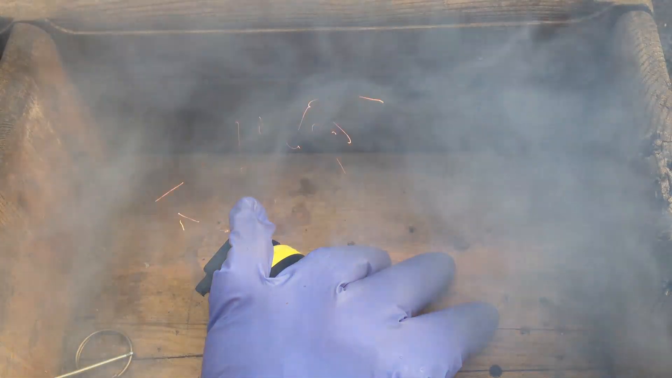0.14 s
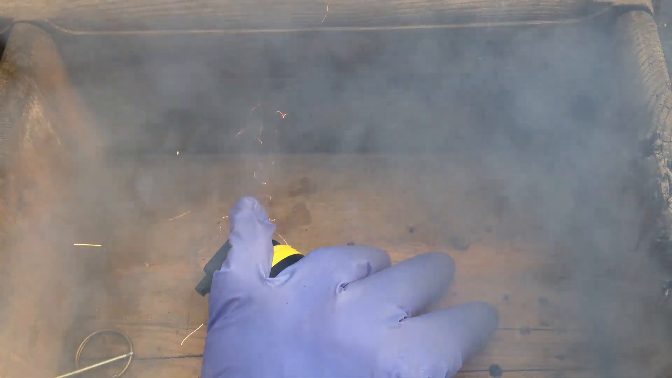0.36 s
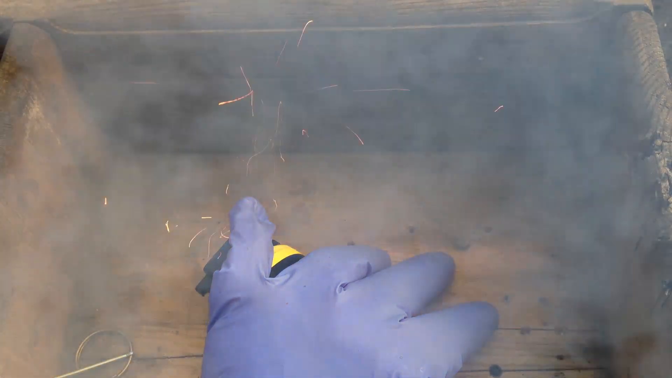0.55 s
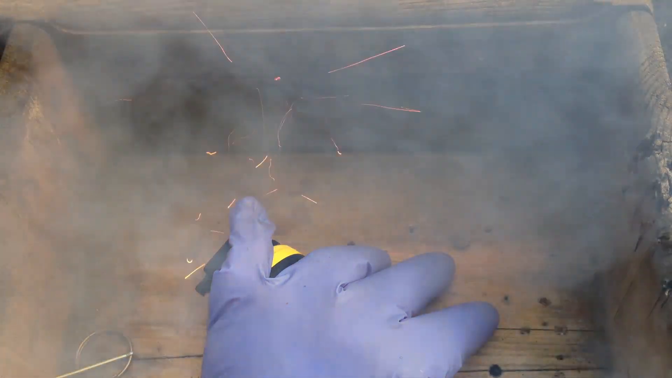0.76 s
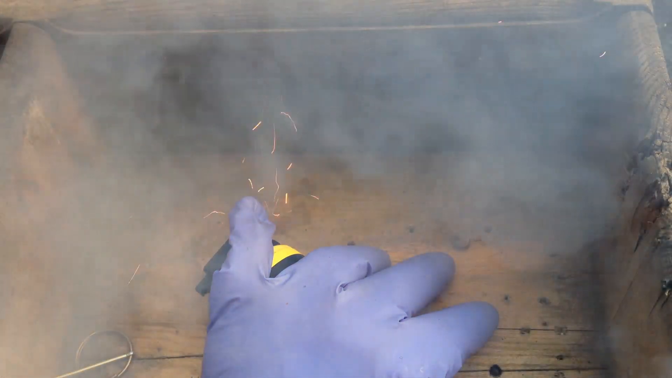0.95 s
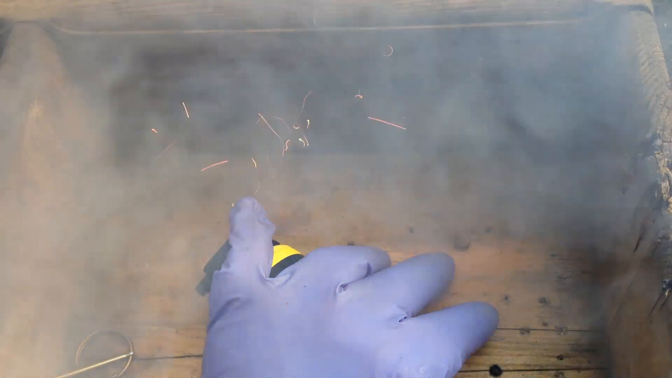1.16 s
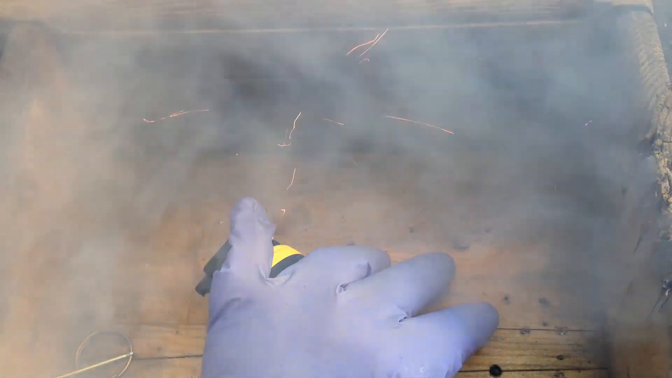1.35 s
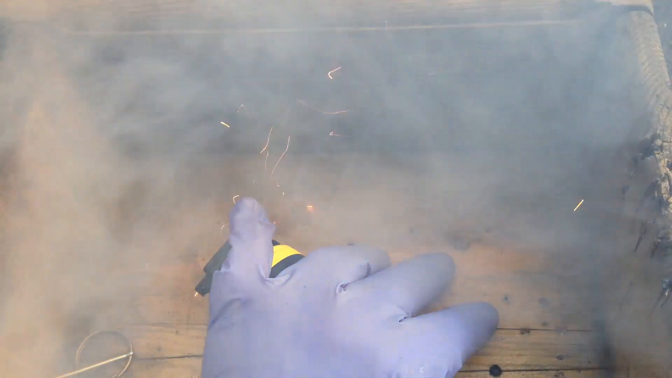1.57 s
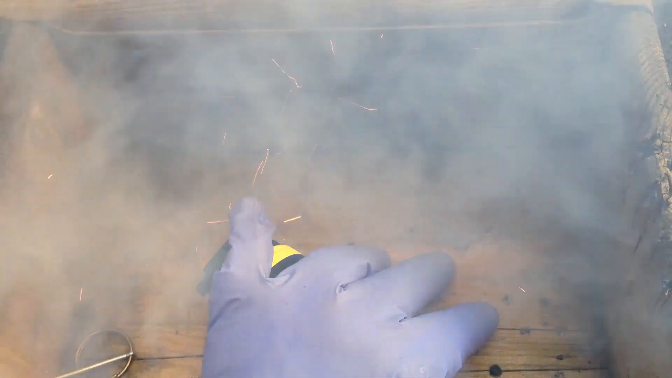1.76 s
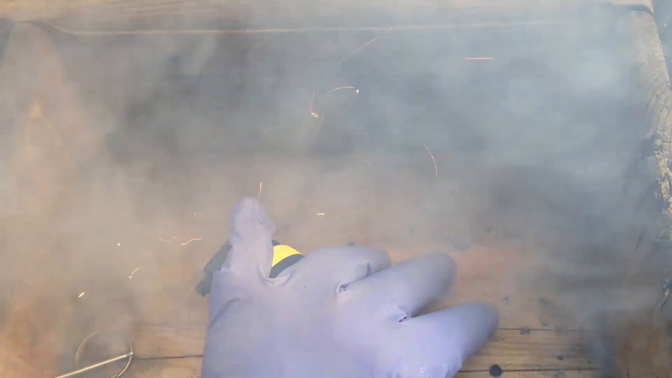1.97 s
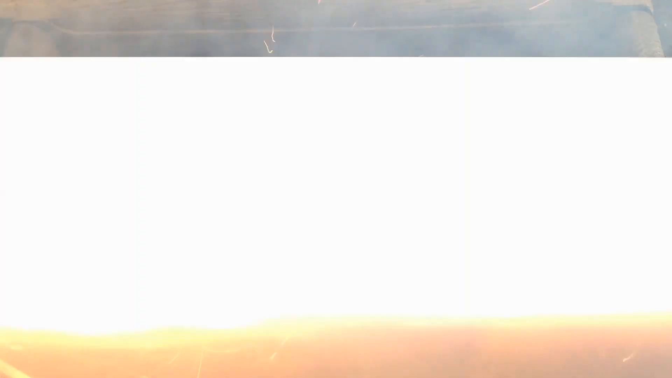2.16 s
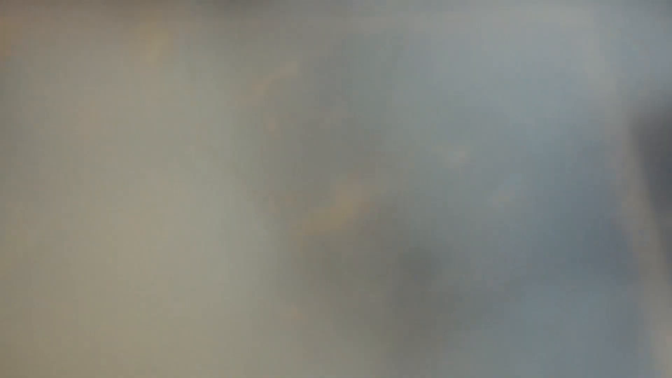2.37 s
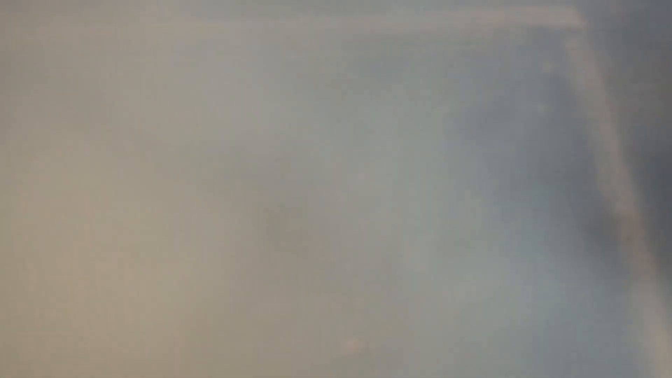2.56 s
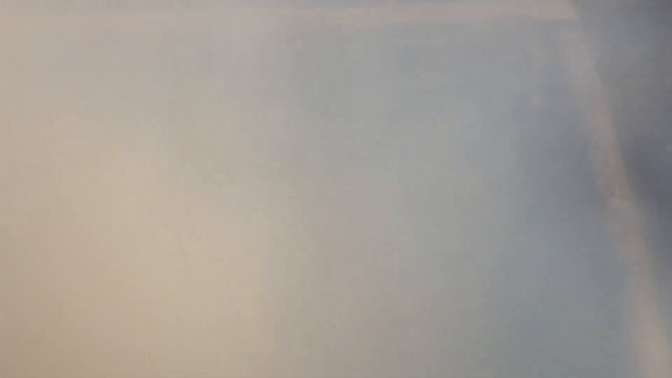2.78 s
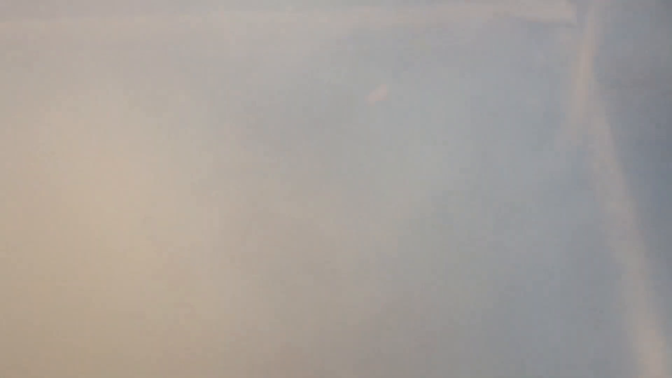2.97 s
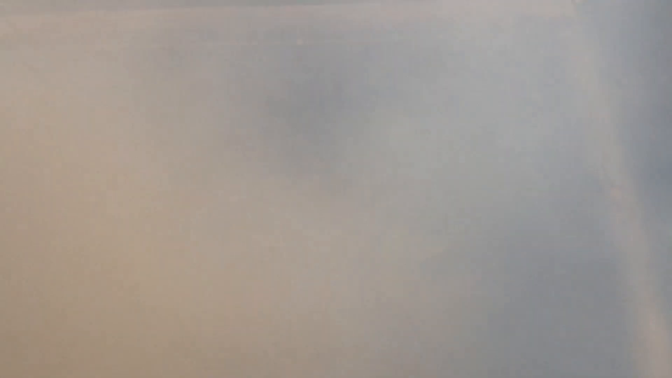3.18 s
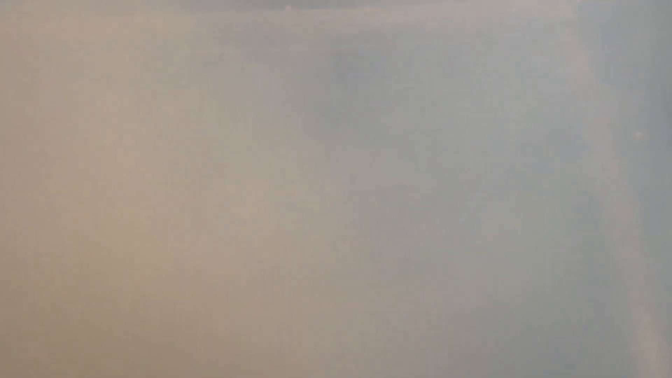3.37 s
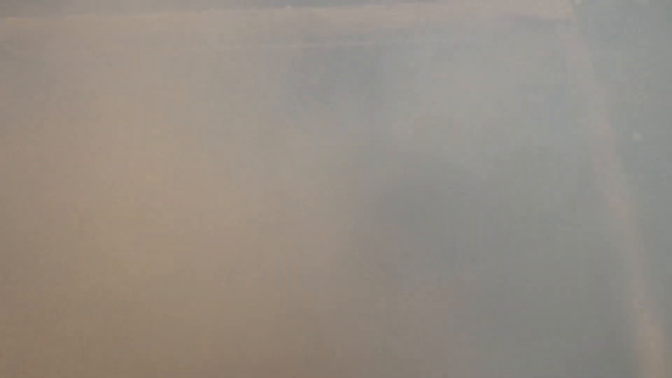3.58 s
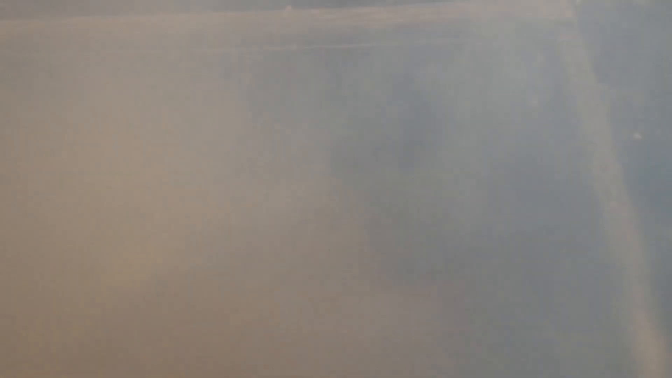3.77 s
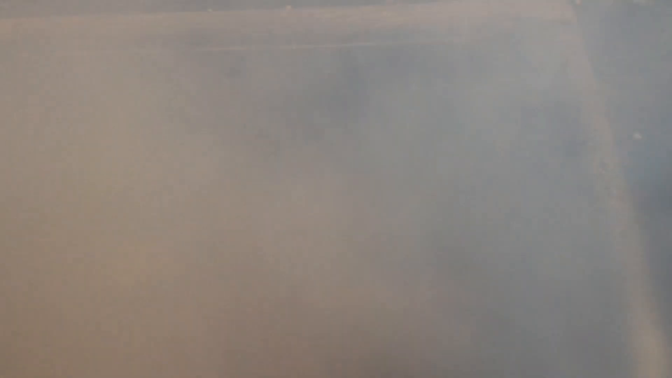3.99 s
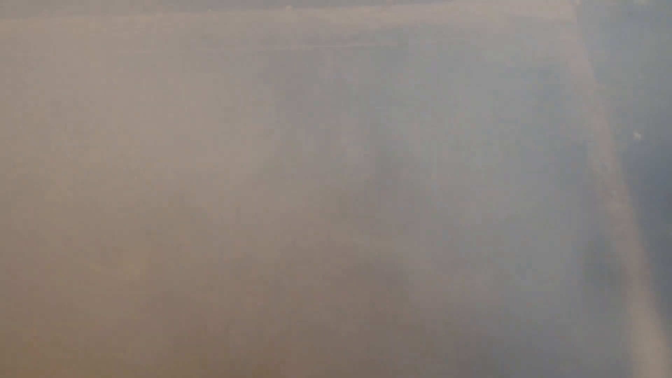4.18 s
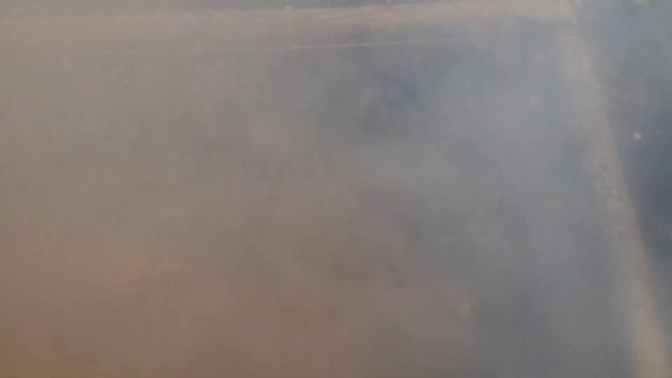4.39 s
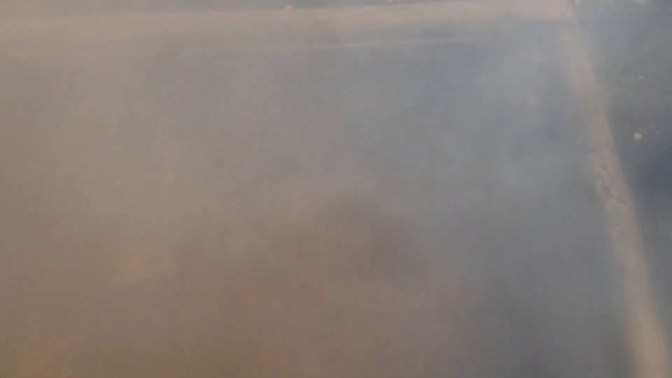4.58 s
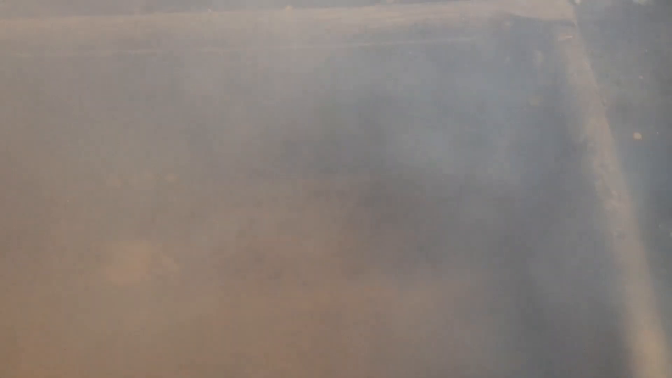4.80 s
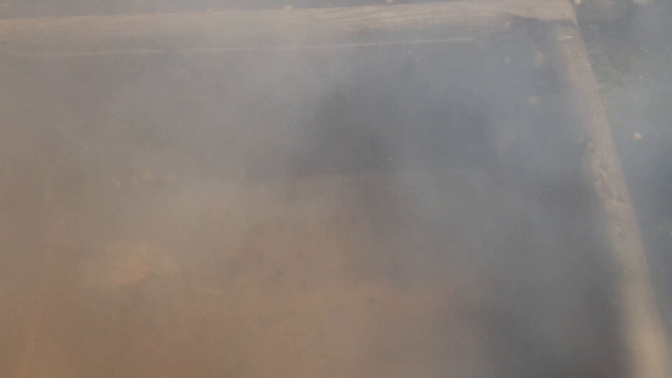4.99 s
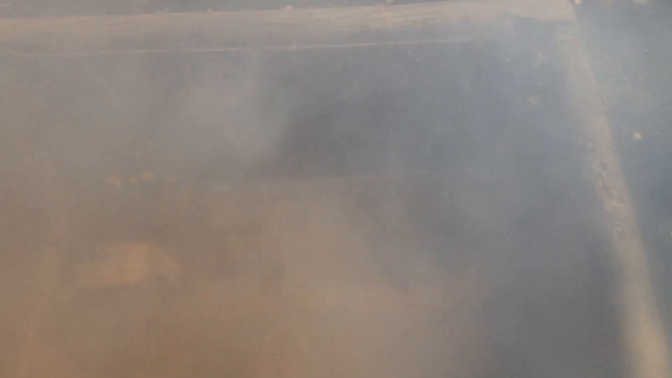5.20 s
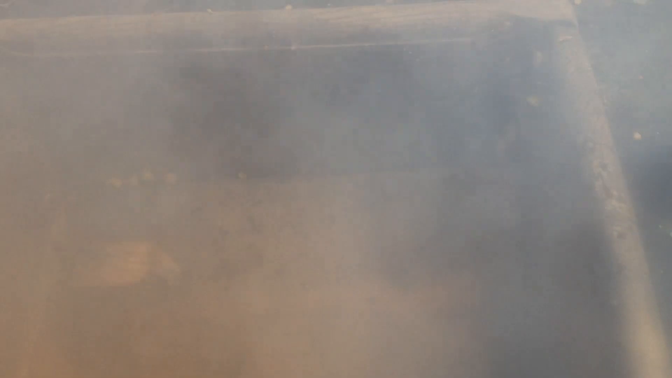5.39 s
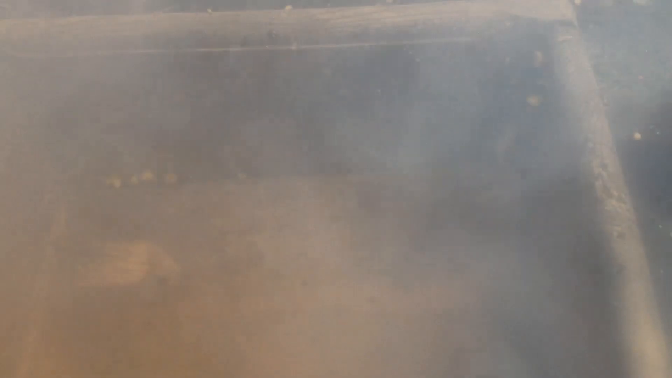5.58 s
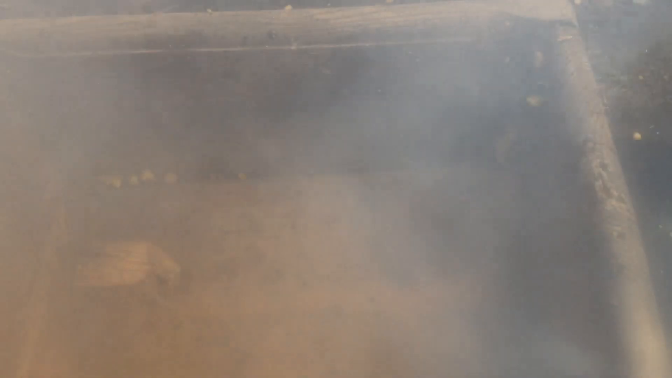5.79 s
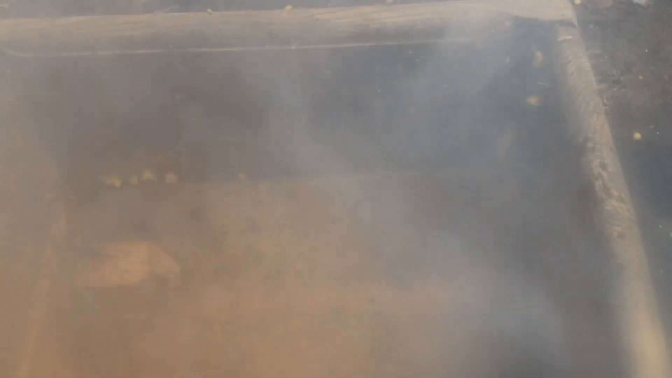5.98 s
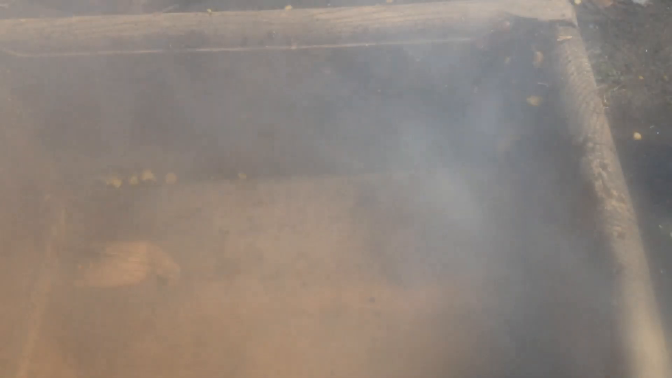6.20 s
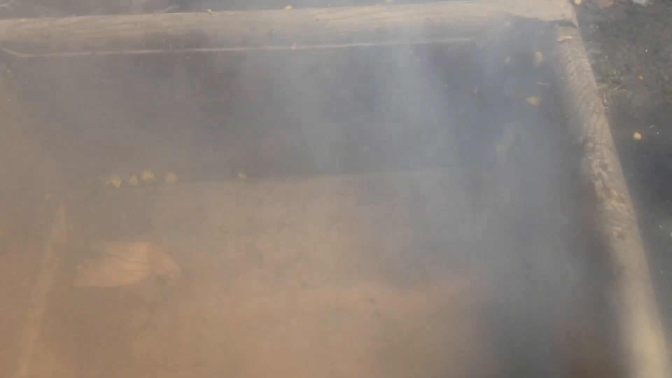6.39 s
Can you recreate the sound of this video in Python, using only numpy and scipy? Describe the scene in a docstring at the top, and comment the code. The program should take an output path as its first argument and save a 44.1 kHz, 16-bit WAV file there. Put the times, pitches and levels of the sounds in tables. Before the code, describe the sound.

Close spitting fuse hiss in a wooden crate bursts into a single hard blast, then debris rains down and thins to faint ticks over distant rumble.

```python
"""In an open wooden crate outdoors, a fuse hisses and roars, flares up and sets off a small charge.
The fuse is shaped noise coloured by the crate; the blast is one sharp pressure pulse and fading bands of noise.
Grit, made of short noise puffs, rains back with fragments that click, knock and ring the boards.
Dark, low noise makes a distant rumble that swells again at the end.
A close mono microphone overloads on the blast."""
import sys
import numpy as np
from scipy import signal
from scipy.fft import rfft, irfft
from scipy.io import wavfile

SR = 44100
rng = np.random.default_rng(int(sys.argv[2]) if len(sys.argv) > 2 else 0)


def unload_wav(signal):
    """Save mono or channel-first audio to the path in sys.argv[1] as 16-bit WAV at rate SR, clipped to [-1, 1]."""
    wavfile.write(
        sys.argv[1],
        SR,
        np.round(np.clip(np.atleast_2d(signal).T, -1, 1) * 32767).astype(np.int16),
    )


def voltage_ratio(level):
    """Linear amplitude factor for a level in decibels (scalar or array-like)."""
    return 10 ** (np.asarray(level, float) / 20)


N = 284312  # length in samples
HZ = np.maximum(np.fft.rfftfreq(N, 1 / SR), 1)  # every frequency of the spectrum

# strength of the fuse jet: (time [s], hiss level [dB])
FUSE_JET = [(0.0, -26), (0.25, -27.5), (0.3, -23), (0.6, -23), (1.25, -21.5), (2.16, -22.5)]
# the flame reaches the charge and puffs: (time [s], dull puff [dB], bright puff [dB], time to fall 60 dB [s])
FLARE_PUFFS = [(2.17, -17, -27, 0.09), (2.182, -23.5, -21, 0.057), (2.196, -24, -29, 0.15)]
# tone of the dull puffs: (frequency [Hz], relative level [dB])
FLARE_TONE = [(59, -43), (100, -19), (721, -1), (1160, -5.5), (2030, -7), (2330, -1), (2680, -7),
              (4000, -13), (5200, -44), (8800, -120)]
# tone of the hiss: (frequency [Hz], relative level [dB])
HISS_TONE = [(880, -61), (1500, -12.5), (2010, -16.5), (2240, -10), (2540, -14), (2890, -11.5),
             (3720, -20.5), (4750, 0.5), (7020, -8.5), (8130, -7.5), (9790, -14), (10700, -14),
             (12300, -18.5), (13700, -13.5), (15500, -15.5)]
# tone of the roar: (frequency [Hz], relative level [dB])
ROAR_TONE = [(180, -15), (300, -8.5), (648, 2), (734, 4), (2010, -2.5), (2230, 2), (2550, -11),
             (2860, -0.5), (3600, 1.5), (4680, -9), (7920, -120)]
# crate resonances that colour the jet: (frequency [Hz], width [Hz], change [dB])
CRATE_RESONANCES = [(2268, 35, 7), (2890, 120, 6.5), (3430, 68, 6.5), (4063, 48, 7.5), (4300, 60, 5),
                    (4700, 39, 5.5), (4680, 46, 2.5), (5050, 57, -4), (5535, 60, 9), (5900, 57, 8),
                    (6280, 38, 8), (6670, 68, 7), (7000, 93, 5.5), (7360, 96, 6), (7910, 110, 7),
                    (8400, 120, 5.5)]
# narrow dips in the tone of the jet: (frequency [Hz], width [Hz], change [dB])
JET_DIPS = [(2590, 52, -7), (2770, 44, -5), (2965, 94, -9.5), (3410, 31, -16), (3700, 46, -8),
            (4310, 47, -13), (4410, 57, -5), (5700, 59, -5), (7170, 46, -9), (7150, 53, -20),
            (9200, 60, -1), (9640, 100, -10), (9800, 89, -9), (12500, 110, -21), (14350, 100, -8)]
# low modes of the air in the crate, heard on the rumble: (frequency [Hz], width [Hz], change [dB])
CRATE_AIR_MODES = [(172, 25, -1), (232.5, 16, 5.5), (373, 33, 3.5), (444, 30, 2), (556, 32, 5),
                   (746, 53, 2), (1000, 30, 3), (1137, 39, 5.5), (1252, 37, 6), (1324, 22, 7.5),
                   (1550, 20, 2)]
# distant rumble, swelling and fading: (time [s], level [dB])
RUMBLE_LEVEL = [(0.0, -34.5), (0.48, -35), (1.18, -34), (1.49, -36.5), (1.8, -36), (2.66, -39.5),
                (3.34, -38), (3.82, -42.5), (4.79, -43.5), (5.3, -41.5), (5.85, -37.5), (6.45, -38)]
# tone of the rumble: (frequency [Hz], relative level [dB])
RUMBLE_TONE = [(15, -74), (25, -49), (86, -7), (126, -3), (204, 5.5), (313, 0), (537, -1.5), (631, -3),
               (741, -2), (1240, -3.5), (1800, -9.5), (2230, -10.5), (2420, -16.5), (6210, -24),
               (15500, -40.5)]
# the blast by pitch: (frequency [Hz], level at its height [dB], time to its height [s], time to fall 60 dB [s])
BLAST_BANDS = [(30, -47, .01, .3), (60, -38.5, 0.045, .5), (121, -26, 0.066, .45), (221, -12.5, 0.072, 0.6),
               (337, -15, 0.094, 0.17), (570, -10.5, 0.061, 0.43), (940, -11.5, 0.035, 0.42),
               (2000, -11, 0.043, 0.27), (4000, -13, 0.041, 0.3), (8040, -19, 0.022, 0.43),
               (15000, -29, 0.024, 0.42)]
# amount of falling grit: (time [s], patter level [dB])
GRIT_LEVEL = [(2.33, -22), (2.51, -24.5), (2.7, -27.5), (3.04, -34), (3.25, -32.5), (3.47, -40.5),
              (3.99, -52.5), (4.3, -44.5), (4.6, -59.5)]
# tone of the patter: (frequency [Hz], relative level [dB])
GRIT_TONE = [(180, -24), (300, 1.5), (410, -28), (447, 0), (480, 0), (1050, -9.5), (1380, -6), (2360, -6),
             (4230, -7.5), (7480, -6), (9000, -14.5), (11700, -63), (19800, -120)]
# fragments landing: (time [s], strength [dB], knock pitch [Hz], thud against knock [dB], tick against knock [dB])
LANDINGS = [(2.418, -6, 7700, -12, -6), (2.4317, -16, 3670, -16, -8), (2.7053, -12, 5950, -11, 2),
            (2.7647, -19, 4760, -23, -12), (2.7784, -29, 6520, -15, -10), (2.82, -23, 2820, -10, -8),
            (2.8572, -13, 2310, 5.5, -8), (2.8898, -15, 2740, -7, -6), (2.9955, -21, 6030, 3, -12),
            (3.0253, -21, 3920, 11, -18), (3.053, -19, 1100, 4, -10), (3.0726, -21, 4120, 0, 3),
            (3.2104, -22.5, 4670, 14, 8), (3.3409, -9.5, 3300, -25, -20), (3.4274, -8, 3660, -11.5, -9),
            (3.5541, -21.5, 1890, -9, -17), (3.7143, -1, 4560, -21, -8), (3.765, -26, 2870, -10, -1),
            (3.8496, -31, 3320, 6, -13), (3.8995, -30, 2010, -9, -14), (3.9545, -28.5, 2660, -5, -12),
            (4.0047, -34, 6000, -2, -2), (4.0417, -32.5, 6000, -8, 0), (4.569, -38.5, 650, 16, -16),
            (4.8319, -30.5, 900, 11, -19), (4.994, -37, 3500, -12, -9)]
# small hard bits that snap on the wood with little body:
# (time [s], click strength [dB], knock pitch [Hz], thud against knock [dB], tick against knock [dB])
HARD_SNAPS = [(2.369, -6, 2000, -6, -12), (2.646, -14, 2090, -9, -8), (2.931, -9.5, 3600, 5.5, 5.5),
              (2.9457, -12.5, 4150, -17, 8), (2.9836, -6.5, 3200, 1, 6), (3.3043, -4, 2700, -7, -15),
              (3.829, -22, 3500, 5, -14), (3.9325, -26, 4650, 2, -5), (4.4299, -17.5, 3480, -1, -6)]
# fragments landing, the longer ones sliding in softly:
# (time [s], strength [dB], knock pitch [Hz], tick against knock [dB], time to fall 60 dB [s])
TIMED_LANDINGS = [(2.5234, -18.5, 7250, 6.5, 0.38), (2.589, -10.5, 4900, 3, 0.15),
                  (2.6176, -13, 4590, -5, 0.094), (3.099, -18, 1550, -3, 0.061),
                  (3.1657, -23.5, 3540, 4, 0.078), (3.198, -15, 740, -16, 0.25),
                  (3.2314, -26, 2240, -9, 0.074), (3.265, -18.5, 3150, -20, 0.078),
                  (3.4494, -23, 4500, 1, 0.14), (3.6611, -28.5, 3690, -7, 0.095),
                  (3.7994, -24.5, 7900, -6, 0.087), (3.8726, -26.5, 3800, -12, 0.09),
                  (4.153, -22, 6700, -2.5, 0.34), (4.3535, -28.5, 2370, 9, 0.094),
                  (4.7594, -39.5, 1570, 1, 0.14), (5.442, -38.5, 4000, -2, 0.25),
                  (6.4283, -31, 1520, 1, 0.13)]
# struck boards: (frequency [Hz], relative level [dB], time to fall 60 dB [s])
BOARD_MODES = [(1690, 10, 0.26), (2245, 8.5, 0.21), (2834, 0, 0.096), (3350, 9, 0.037), (4130, -24, 0.21),
               (4355, 10, 0.098), (4760, 4, 0.17), (6200, 6, 0.086), (8400, 0, 0.2), (8700, -30, 0.28),
               (10000, -39, 0.11), (10150, -24, 0.16), (10830, -21, 0.077)]

# T60 means the time to fall 60 dB
ROAR_BELOW_DB, GUST_DB, GUSTS_PER_S = -15.5, 2.5, 4.2  # the roar under the hiss, and how it gusts
FLARE_ATTACK_S = 0.0028
CHOKE_S, CHOKE_DB, CHOKE_LENGTH_S = 2, -12, 0.0083  # the jet falters as the flame enters the case
BANG_S, SHOCK_DB, SHOCK_S = 2.2468, -2, 0.00105
AT_ONCE_HZ, SURGE_POWER = 500, 2.9  # far above this pitch the blast starts at full height; far below it surges late
LUMPS_DB, LUMPS_PER_S = 1.5, 37  # the boom comes back from the walls in lumps
GRAINS_PER_S, GRAIN_T60_S = 700, 0.021  # the rate wavers
FINE_SHARE = 0.3  # even patter under the separate grains
DUST_DB, DUST_SETTLES_DB_PER_S = -4.5, 7.5  # finer dust against the patter
HIT_T60_S, LOUD_HIT_DB, T60_S_PER_DB = 0.044, -4.5, 0.01  # the heaviest pieces sound longer
CLICK_DB, CLICK_CYCLES = -14, 4.5  # first contact rings a few cycles
THUD_ATTACK_S = 0.00079  # the thud swells after the contact
SNAP_CLICK_DB, SNAP_T60_S = 8, 0.049  # the click of a snap is set this far over its strength as a hit
TIMED_THUD_DB = -8  # thud against knock in TIMED_LANDINGS
OVERLOAD, CUTOFF_HZ = 0.82, 15850  # full-scale limit of the input; pitch where the top is fully cut


def rms_one(x):
    """Scales a sound to an average strength (rms) of one."""
    return x / np.sqrt(np.mean(x ** 2) + 1e-20)


def in_time(rows):
    """Draws straight lines between the rows of a table, one value a sample, for each column."""
    s, *columns = np.transpose(rows)
    return [np.interp(np.arange(N) / SR, s, c) for c in columns]


def at_hz(points, hz, column=1):
    """Reads a table between its frequencies, with octaves equally wide."""
    points = np.array(points)
    return np.interp(np.log(hz), np.log(points[:, 0]), points[:, column])


def resonances_db(rows):
    """Adds up peaks (or dips) in dB, each falling to half its dB half a width away."""
    return sum(db / (1 + (2 * (HZ - hz) / width) ** 2) for hz, width, db in rows)


def coloured(x, db):
    """Gives every frequency its own gain in dB, then scales to rms one."""
    return rms_one(irfft(rfft(x) * voltage_ratio(db), N))


def band(x, low_hz, high_hz):
    """Keeps mainly the pitches between two limits, without sounding ahead of time."""
    return signal.sosfilt(signal.butter(2, [low_hz, high_hz], "band", fs=SR, output="sos"), x)


def drift(rate):
    """Slow random wandering with rms one: noise smoothed twice, faster for a higher rate."""
    r = np.exp(-2 * np.pi * rate / SR)
    smooth = signal.lfilter([1], [1, -2 * r, r * r], rng.standard_normal(N + SR))
    return rms_one(smooth[SR:])  # leave out the start-up


def fuse():
    """Turbulent gas from the burning tip: bright fluttering hiss, dull gusty roar, last puffs, then silence."""
    t = np.arange(N) / SR
    choke_db = CHOKE_DB * np.exp(-((t - CHOKE_S) / CHOKE_LENGTH_S) ** 2)
    jet_db = in_time(FUSE_JET)[0] + choke_db
    peaks_and_dips_db = resonances_db(CRATE_RESONANCES + JET_DIPS)
    fluttering = rng.standard_normal(N) * voltage_ratio(0.7 * drift(45))
    hiss = coloured(fluttering, at_hz(HISS_TONE, HZ) + peaks_and_dips_db)
    rough = rng.standard_normal(N) * voltage_ratio(2.2 * drift(24))
    roar = coloured(rough, at_hz(ROAR_TONE, HZ) + peaks_and_dips_db)
    flare = coloured(rng.standard_normal(N), at_hz(FLARE_TONE, HZ))
    gusts = voltage_ratio(ROAR_BELOW_DB + GUST_DB * drift(GUSTS_PER_S))
    out = voltage_ratio(jet_db) * (hiss + gusts * roar)
    for s, dull_db, bright_db, t60 in FLARE_PUFFS:
        since = np.maximum(t - s, 0)
        shape = np.minimum(since / FLARE_ATTACK_S, 1) * voltage_ratio(-60 * since / t60)
        out += shape * (voltage_ratio(dull_db) * flare + voltage_ratio(bright_db) * hiss)
    return out * (t < BANG_S)


def outdoors():
    """Dull far noise, gently uneven, coloured by the air in the crate."""
    (level_db,) = in_time(RUMBLE_LEVEL)
    tone_db = at_hz(RUMBLE_TONE, HZ) + resonances_db(CRATE_AIR_MODES)
    return voltage_ratio(level_db + 1.0 * drift(5.7)) * coloured(rng.standard_normal(N), tone_db)


def self_noise():
    """The microphone's own faint hiss: steady noise, equally strong at all pitches."""
    return voltage_ratio(-69.5) * rng.standard_normal(N)


def bang():
    """An N-shaped pressure shock, then the crate and yard answer; lows build later than highs."""
    t = np.maximum(np.arange(N) / SR - BANG_S, 0)
    out = voltage_ratio(SHOCK_DB) * (1 - 2 * t / SHOCK_S) * (t > 0) * (t < SHOCK_S)
    edges = 25 * 2 ** np.arange(0, 9.6, 0.5)  # half-octave bands [Hz]
    white = rng.standard_normal((2, N))
    lumps = [drift(LUMPS_PER_S) for _ in edges[::3]]  # three neighbouring bands share one
    for k, (low, high) in enumerate(zip(edges, edges[1:])):
        middle = np.sqrt(low * high)
        db, height_s, t60 = (at_hz(BLAST_BANDS, middle, column=c) for c in range(1, 4))
        at_once = low / (low + AT_ONCE_HZ)
        surge = np.minimum(t / height_s, 1) ** SURGE_POWER
        build = (at_once + (1 - at_once) * surge) * (t > 0)
        fall_db = -60 * np.maximum(t - height_s, 0) / t60
        boom = rms_one(band(white[k % 2], low, high))
        out += boom * build * voltage_ratio(LUMPS_DB * lumps[k // 3] + db + fall_db)
    return out


def grit():
    """Uneven falling grains, each a short puff of noise, over finer dust that settles sooner."""
    (patter_db,) = in_time(GRIT_LEVEL)
    t = np.arange(N) / SR
    born = rng.random(N) < GRAINS_PER_S * voltage_ratio(2.5 * drift(40)) / SR
    sizes = voltage_ratio(3.0 * np.minimum(rng.exponential(1, N), 4)) * born
    puffs = rms_one(signal.lfilter([1], [1, -voltage_ratio(-60 / (GRAIN_T60_S * SR))], sizes))
    patter = coloured(rng.standard_normal(N) * (puffs + FINE_SHARE), at_hz(GRIT_TONE, HZ))
    dust = rms_one(band(rng.standard_normal(N) * (puffs + 0.83), 13000, 21300))
    dust_db = DUST_DB - DUST_SETTLES_DB_PER_S * (t - BANG_S)
    started = t > GRIT_LEVEL[0][0]
    fade_out = np.clip((GRIT_LEVEL[-1][0] + 0.32 - t) / 0.17, 0, 1)
    return (patter + dust * voltage_ratio(dust_db)) * voltage_ratio(patter_db) * started * fade_out


def fragments():
    """Each landing knocks at its own pitch, with a thud below and a tick above, and rings the boards anew."""
    out, t = np.zeros(N + SR), np.arange(SR // 4) / SR
    # every row: time, strength, knock pitch, thud, tick, fall time, click
    rows = []
    for s, db, hz, thud_db, tick_db in LANDINGS:
        t60 = HIT_T60_S + T60_S_PER_DB * max(db - LOUD_HIT_DB, 0)
        rows.append((s, db, hz, thud_db, tick_db, t60, CLICK_DB))
    for s, db, hz, thud_db, tick_db in HARD_SNAPS:
        rows.append((s, db - SNAP_CLICK_DB, hz, thud_db, tick_db, SNAP_T60_S, SNAP_CLICK_DB))
    for s, db, hz, tick_db, t60 in TIMED_LANDINGS:
        rows.append((s, db, hz, TIMED_THUD_DB, tick_db, t60, CLICK_DB))

    white = rng.standard_normal((3, N + SR))
    thud = rms_one(band(white[0], 350, 1270))
    broad = rms_one(band(white[1], 1500, 5820))
    tick = rms_one(band(white[2], 8000, 20600))
    strength_db = rng.normal(0, 2.4, (len(rows), len(BOARD_MODES)))
    phase = rng.uniform(0, 2 * np.pi, (len(rows), len(BOARD_MODES)))
    hz, mode_db, mode_t60 = np.transpose(BOARD_MODES)[:, :, None]
    for k, (s, db, knock_hz, thud_db, tick_db, t60, click_db) in enumerate(rows):
        start = round(s * SR)
        here = slice(start, start + len(t))
        knock = rms_one(band(white[1, here], knock_hz / 1.7, knock_hz * 1.53)) + 1.09 * broad[here]
        # board modes near the knock ring most
        struck_db = mode_db + strength_db[k, :, None] - 9 * abs(np.log2(hz / knock_hz))
        waves = np.sin(2 * np.pi * hz * t + phase[k, :, None])
        ring = np.sum(voltage_ratio(struck_db - 60 * t / mode_t60) * waves, axis=0)
        swelling_thud = voltage_ratio(thud_db) * thud[here] * np.minimum(t / THUD_ATTACK_S, 1)
        crack = knock + swelling_thud + voltage_ratio(tick_db) * tick[here]
        slide = max(t60 - 0.07, 0)  # long contacts slide in softly
        contact = voltage_ratio(-6 - 180 * slide - 60 * t / 0.016)
        body = voltage_ratio(-7.0 + 20.5 * slide - 60 * t / t60)
        wall_echo = voltage_ratio(-19 - 60 * t / 0.24)  # faint, from the crate walls
        hit = crack * (contact + body + wall_echo) + voltage_ratio(-10.5 - 30 * t / t60) * ring
        out[here] += voltage_ratio(db - 11.5) * hit * np.minimum(t / (0.00048 + 0.019 * slide), 1)
        fall_db = -60 * t * knock_hz / CLICK_CYCLES
        out[here] += voltage_ratio(db + click_db - 330 * slide + fall_db) * np.sin(2 * np.pi * knock_hz * t)
    return band(out[:N], 250, 19000)  # the landings carry no bass


def scene():
    """Adds all sounds at one microphone and puts them on both channels."""
    mix = fuse() + outdoors() + self_noise() + bang() + grit() + fragments()
    return np.tile(mix, (2, 1))


def roll_off(x):
    """The treble ends steeply here."""
    return signal.sosfilt(signal.butter(12, 16240, fs=SR, output="sos"), x)


def record(dry):
    """The microphone input flattens loud peaks; bass and top are cut after it."""
    clipped = dry / (1 + np.abs(dry / OVERLOAD) ** 3.0) ** (1 / 3.0)
    no_bass = signal.sosfilt(signal.butter(1, 40, "high", fs=SR, output="sos"), clipped)
    finished = signal.sosfilt(signal.cheby2(14, 50, CUTOFF_HZ, fs=SR, output="sos"), no_bass)
    return roll_off(finished)


dry = scene()
out = record(dry)
unload_wav(out)
```